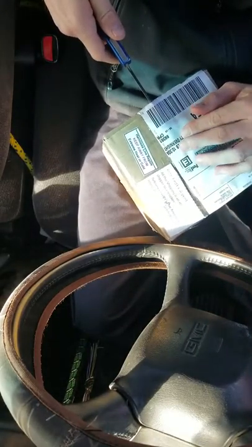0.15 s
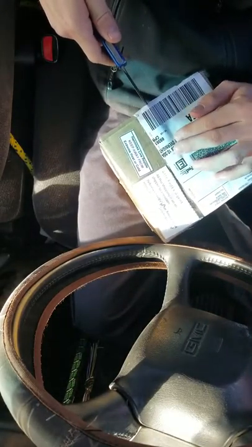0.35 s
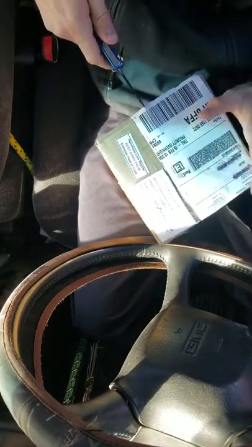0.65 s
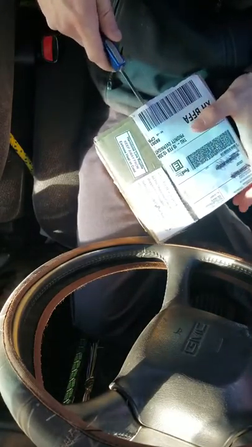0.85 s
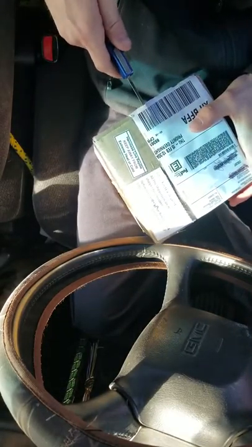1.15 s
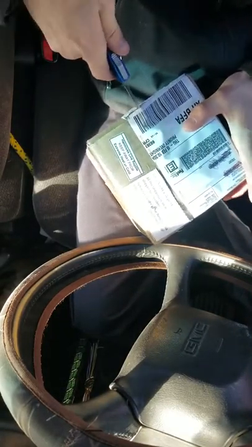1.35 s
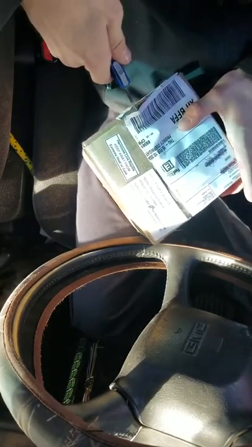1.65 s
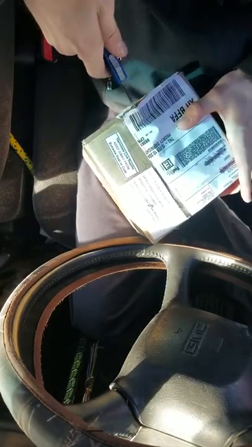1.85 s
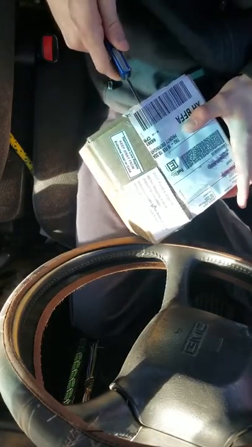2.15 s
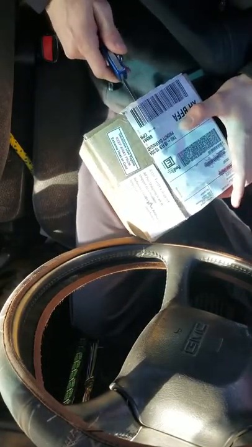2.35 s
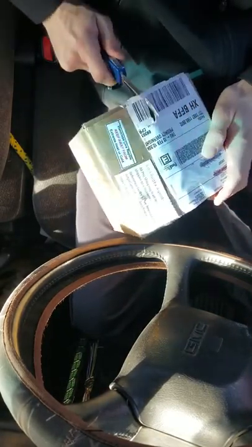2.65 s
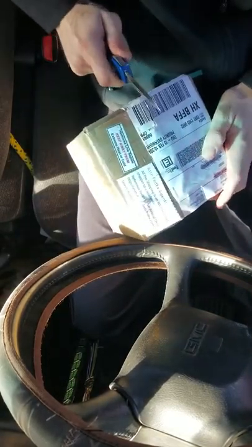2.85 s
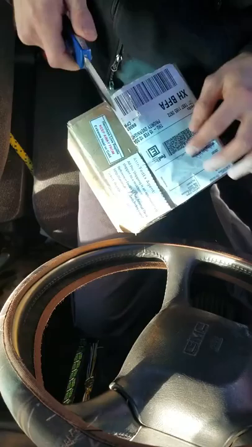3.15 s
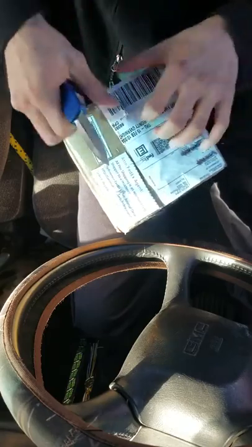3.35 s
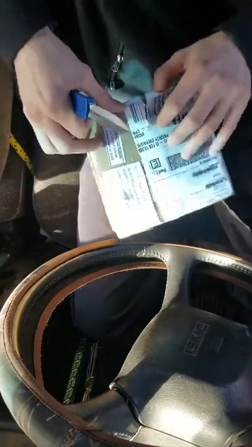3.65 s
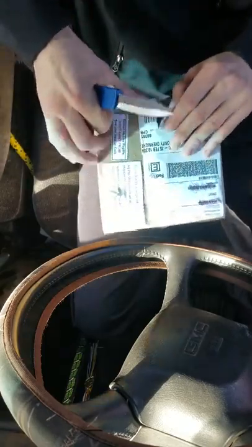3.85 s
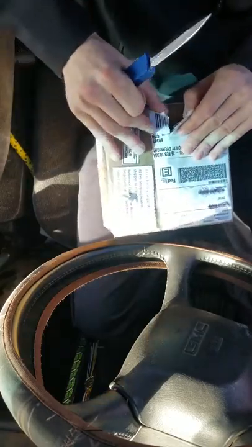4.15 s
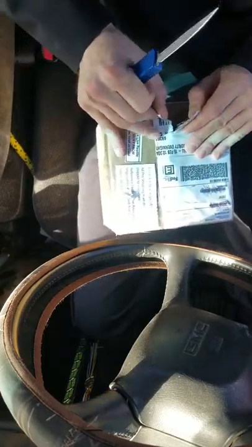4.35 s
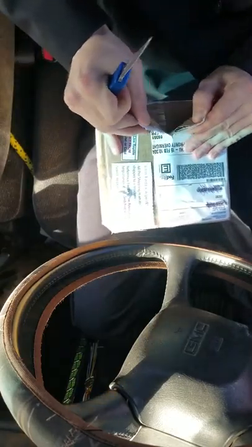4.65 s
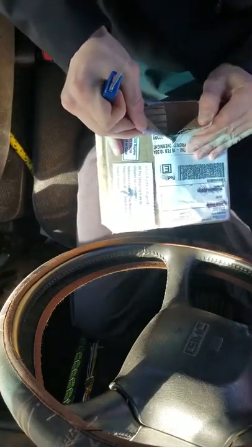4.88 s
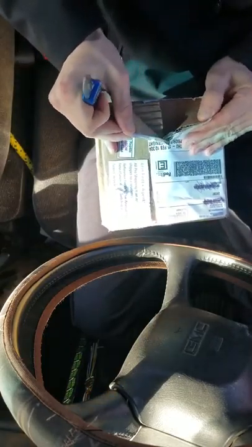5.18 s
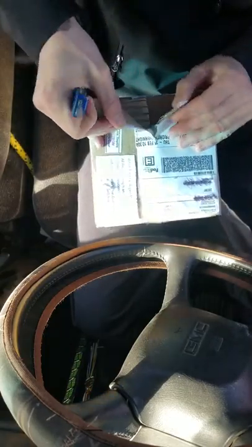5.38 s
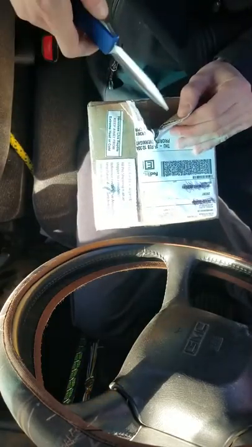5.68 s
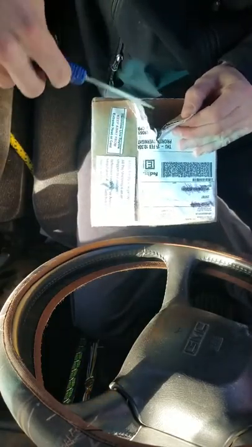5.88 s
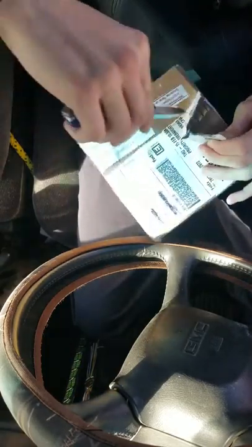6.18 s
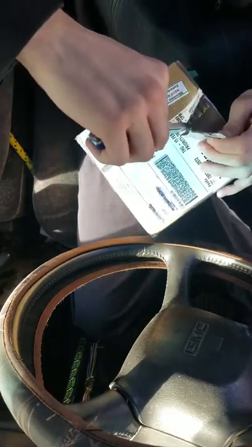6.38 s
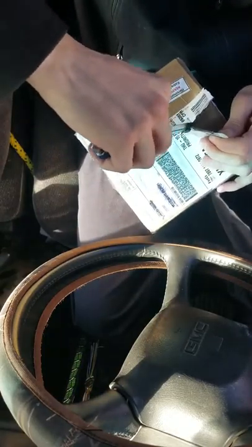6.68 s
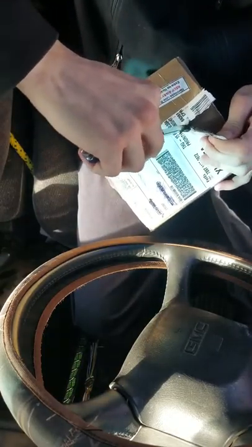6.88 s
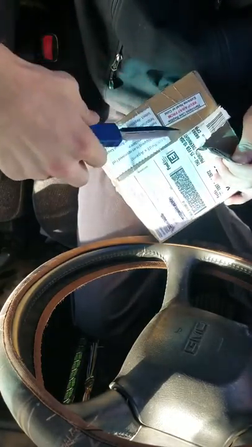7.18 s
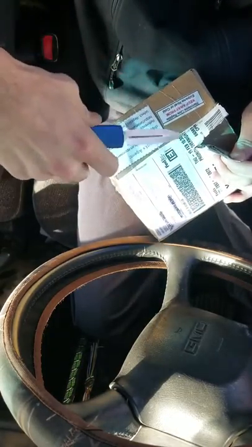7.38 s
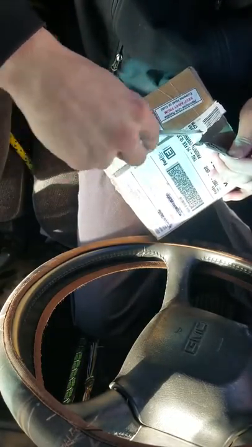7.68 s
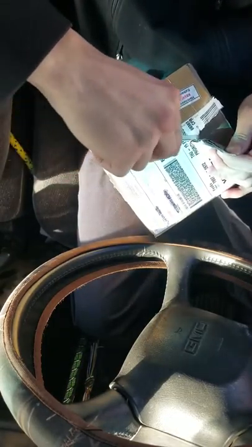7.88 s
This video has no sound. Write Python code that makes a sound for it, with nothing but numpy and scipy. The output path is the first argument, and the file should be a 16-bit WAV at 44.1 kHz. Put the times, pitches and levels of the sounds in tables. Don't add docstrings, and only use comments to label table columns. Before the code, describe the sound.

Close, dry stereo phone pickup inside a parked vehicle, with soft traffic rumble and faint hiss. A knife works through tape and cardboard in quick ticks and scrapes, with a loud hollow crack early and another soon after. After a lull, hands tear and peel tape in sharp crackles, then only soft rubbing, light knocks and a faint dull thud outside.

```python
import sys
import numpy as np
from scipy import signal
from scipy.fft import rfft, irfft, next_fast_len
from scipy.io import wavfile
from scipy.ndimage import uniform_filter1d

SR = 44100
rng = np.random.default_rng(int(sys.argv[2]) if len(sys.argv) > 2 else 0)


def decibels_to_gain(level_db):
    exponent = np.asarray(level_db, float) / 20
    return 10 ** exponent


def pcm_store(signal):
    levels = np.round(np.clip(np.atleast_2d(signal), -1, 1) * 32767)
    wavfile.write(sys.argv[1], SR, levels.astype(np.int16).T)


N = 353682


def on_log(table, hz):
    at, value = np.transpose(table)
    return np.interp(np.log(hz + 1), np.log(at + 1), value)


def unit(x):
    return x / np.sqrt(np.mean(x ** 2))


def walk(rate):
    k = int(SR / rate)
    held = np.repeat(rng.standard_normal(N // k + 1), k)
    return 1.3 * uniform_filter1d(uniform_filter1d(held, k), k)[:N]


def street(alike_hz=450., left_db=0.8, flicker_db=2.5):
    # hz, level_db (per Hz)
    street_colour = [(25, -5), (45, 0.5), (62, -6.5), (125, -2.5), (170, -10), (300, -20), (500, -25),
                     (800, -21.5), (1150, -29), (1900, -36), (2800, -39), (3400, -51.5), (8000, -47),
                     (15500, -48)]
    # hz, width_hz, boost_db
    cab_air = [(45, 30, 3), (87.5, 6.5, 11), (776, 150, 0.5), (2600, 500, 1.5)]
    # time_s, level_db
    surge = [
        (0.0, -64),
        (0.85, -59),
        (3.28, -69),
        (4.87, -62.5),
        (5.689, -64.5),
        (7.0, -63),
        (7.25, -58),
        (7.6, -62),
        (8.02, -57.5),
    ]
    hz = np.arange(N // 2 + 1) * SR / N
    mid, side = rfft(rng.standard_normal((2, N))) * decibels_to_gain(on_log(street_colour, hz))
    for air_hz, width_hz, db in cab_air:
        boost = 1 + (decibels_to_gain(db) - 1) / (1 + (2 * (hz - air_hz) / width_hz) ** 2)
        mid, side = mid * boost, side * boost
    alike = .97 / (1 + (hz / alike_hz) ** 2)
    mid, side = mid * np.sqrt(1 + alike), side * np.sqrt(1 - alike)
    spectrum = np.array([mid + side, mid - side])
    spectrum *= decibels_to_gain(-51) / np.std(irfft(mid, N))
    s, db = np.transpose(surge)
    swell_db = np.interp(np.arange(N) / SR, s, db - np.interp(7.4, s, db))
    swell = decibels_to_gain(swell_db + flicker_db * walk(7.2))
    low = 1 / (1 + (hz / 150) ** 4)
    rumble = irfft(spectrum * low, N) * swell
    steady = irfft(spectrum * (1 - low), N)
    return (rumble + steady) * decibels_to_gain(np.array([[left_db], [-left_db]]))


def resonate(x, part):
    box_parts = {"hollow": (95, 420, -1), "panel": (400, 1250, 1), "flap": (1250, 3200, -1),
                 "box": (400, 2800, 1), "paper": (3200, 8000, -1), "film": (9600, 16500, 1)}
    low_hz, high_hz, polarity = box_parts[part]
    band = signal.butter(2, (low_hz, high_hz), "band", fs=SR, output="sos")
    return polarity * signal.sosfilt(band, x)


def ring(hz, t60, t):
    return np.sin(2 * np.pi * hz * t) * np.exp(-np.log(1000) * t / t60)


def tear(draw, tear_s, main):
    t = np.arange(draw.shape[1]) / SR / tear_s
    rate = np.sqrt(t) * np.exp(-t) * np.where(t < 1, .3, 1)
    spray = draw[3] * (draw[4] > 1.4) * rate
    spray[int(tear_s * SR)] = main
    return spray


def cab(x, noise, shared_hz=1430.0, gap_s=0.00091, wet_db=0, early_s=0.0035, late_db=-10):
    t60_s, cab_db = 0.062, -2.5
    t = np.arange(noise.shape[1]) / SR
    late = decibels_to_gain(late_db) * np.exp(-np.log(1000) * t / t60_s)
    echo = noise * (np.exp(-t / early_s) + late) * (t > gap_s)
    bass = signal.sosfilt(signal.butter(2, shared_hz, fs=SR, output="sos"), echo)
    echo = echo[:2] - bass[:2] + bass[2]
    echo *= decibels_to_gain(cab_db + wet_db) / np.sqrt(np.sum(echo ** 2, axis=1, keepdims=True))
    echo[:, 0] = 1
    return signal.fftconvolve(x[None], echo)


def add(out, s, burst, part, db):
    arrival_s = 0.00017
    i = int((s + arrival_s) * SR)
    burst = resonate(burst, part)[:, :N - i]
    energy = np.sum(burst ** 2, axis=1, keepdims=True)
    out[:, i:i + burst.shape[1]] += burst * decibels_to_gain(db) / np.sqrt(energy * 100 / SR)


def ticks(tear_s=.0013, click=3.63, film_db=-2.26, early_s=0.0039, detune=.035, paper_db=0.24):
    # hz, level_db, t60_s
    paper_modes = [(3330, 7, 0.0016), (4300, -2.5, 0.0011), (5520, -4.5, 0.0021), (7650, -6.5, 0.0023)]
    film_modes = [(8600, -17.5, 0.0015), (11000, -10, .002), (12500, 0, 0.003), (14400, -1, 0.002),
                  (15900, -1, .002)]
    # start_s, paper_db, film_db (over paper)
    blade_ticks = [(.2198, -67, 2), (.3152, -61, -7), (.5251, -46.5, -20), (.7416, -54.5, -0.5),
                   (.8284, -49, -21), (.944, -48, -9), (.9827, -47, -5.5), (1.1462, -36.5, -17),
                   (1.192, -43, -6.5), (1.2525, -33, -7.5), (1.284, -53, -3), (1.342, -51.5, 0),
                   (1.3495, -41, -1.5), (1.3718, -54.5, 3), (1.3844, -48, 0.5), (1.4043, -58.5, -3),
                   (1.43, -26.5, -12), (1.5284, -54, -13), (1.5485, -48.5, -3.5), (1.5685, -47, -5),
                   (1.6125, -42, -9), (1.962, -52, -8), (1.996, -59, -3), (2.021, -59, -2),
                   (2.1222, -48.5, -15), (2.1648, -37.5, -10.5), (2.3173, -47, -15.5), (2.4, -50, -12.5)]
    peel_ticks = [(4.5314, -32, -1), (4.6352, -30, -1), (4.6711, -53, 12.5), (4.7777, -58, 9),
                  (4.806, -35.5, 0), (4.823, -45, 2), (4.883, -54.5, 19.5), (4.8933, -54.5, 18.5),
                  (4.9028, -55, 16), (4.913, -50, 20.5), (4.9258, -37, 3), (4.933, -38, 3), (4.95, -49, 6),
                  (4.969, -46.5, 4), (5.0, -55, 14.5), (5.058, -54, 0), (5.069, -49.5, 2),
                  (5.095, -72.5, 24), (5.132, -54, 9), (5.143, -49.5, 3), (5.2073, -60, 5),
                  (5.276, -58.5, 6), (5.287, -53, 3), (5.344, -56, 1.5), (5.39, -49.5, -10)]
    seam_ticks = [(2.528, -51, -6), (2.5582, -66, 10.5), (2.572, -58, -15), (2.5959, -38.5, 0),
                  (2.633, -24, -12.5), (2.6969, -35.5, -12), (3.046, -65, 1), (3.376, -60, -8),
                  (3.023, -56.5, -9), (3.758, -50.5, -13), (4.041, -56, -1), (4.0831, -49, -4),
                  (4.246, -53, 1.5), (4.3202, -67, 7), (4.402, -62.5, 6.5), (5.576, -58, -8),
                  (6.0015, -76, 7), (6.534, -61.5, 14.5), (6.729, -60, 11.5), (6.758, -61, -3),
                  (6.785, -64, 6), (6.82, -66, 3), (6.99, -70.5, 10), (7.9326, -72, 12)]
    small_ticks = [(.003, -63, -4), (0.14, -70, 2), (.158, -82, 4), (.183, -84, 2), (.6205, -78, -10),
                   (0.6703, -58, -5), (1.175, -57, -4), (1.227, -63, -4), (1.305, -59.5, -6),
                   (1.504, -61, 4), (1.664, -57.5, -8), (1.69, -59.5, -1.5), (1.8818, -58, -12),
                   (1.9407, -72, -8), (2.0444, -63, -9.5), (2.0901, -61, -10), (2.312, -57, -11),
                   (2.356, -71, 6), (2.43, -55.5, -15), (2.446, -59.5, -8), (2.47, -60.5, -2),
                   (2.514, -60.5, -10), (3.4376, -60.5, -8), (3.504, -65.5, 2), (3.5434, -76, -8),
                   (3.6641, -62, -13), (3.704, -56, -3.5), (3.87, -66, -12), (3.966, -66, 0),
                   (4.034, -66, 3), (4.112, -69, 4), (4.332, -71, 5.5), (4.354, -73, -10.5),
                   (4.4643, -63, -3.5), (4.4884, -66.5, 6.5), (4.944, -44, 3.5), (5.111, -62.5, 3),
                   (5.124, -59.5, 8), (5.2449, -71, 7), (5.293, -51.5, 3), (5.3268, -65, -4),
                   (5.3672, -62, 0), (6.035, -74, 8), (6.083, -69, 7), (6.403, -58, -21),
                   (6.633, -75, 12.5), (6.642, -72.5, 13), (6.691, -64, 2), (6.709, -68, 4),
                   (6.769, -69, 9), (6.826, -78, 5), (6.877, -78, 14),
                   (.841, -58, -14), (1.3, -57, -8), (2.6284, -31, -10), (4.652, -49, 0), (4.978, -56, 10),
                  (4.994, -60, 10), (5.036, -62, 8), (5.2651, -61, 4), (5.8502, -74, -3), (5.988, -74, 10),
                  (7.1, -62, -9), (6.416, -63, -15), (5.6, -70, -4), (6.590, -74, 0), (6.637, -72, 12),
                  (6.8245, -61, 3)]
    out, t = np.zeros((2, N)), np.arange(4000) / SR
    rows = blade_ticks + peel_ticks + seam_ticks + small_ticks
    chance = rng.standard_normal((len(rows), 5, len(t)))
    for (s, paper, film), draw in zip(rows, chance):
        glue = tear(draw, tear_s, main=2.1)
        heard = cab(glue, draw[:3], gap_s=0.00052, wet_db=2.7, early_s=early_s, late_db=-9)
        for part, modes, db in (("film", film_modes, paper + film + film_db),
                                ("paper", paper_modes, paper + paper_db)):
            body = sum(decibels_to_gain(gain_db) * ring(hz * (1 + detune * k), t60, t[:600])
                       for (hz, gain_db, t60), k in zip(modes, draw[4, ::-1]))
            body[0] = click
            add(out, s, signal.fftconvolve(heard, body[None]), part, db)
    return out


def pressure():
    # hardest_s, rise_s, fall_s, level_db, film_db (over box)
    blade_strokes = [(.54, 0.063, 0.097, -56.5, -19), (.76, 0.29, 0.45, -57, -12),
                     (.99, 0.045, 0.79, -54, -16), (1.28, 0.11, 0.47, -55, -4.5),
                     (1.399, 0.13, 0.18, -49, -10), (1.64, 0.33, 0.18, -58.5, -4.5),
                     (1.909, 0.14, 0.12, -51.5, -11), (2.15, 0.063, 0.084, -49.5, -17),
                     (2.42, 0.12, 0.26, -57, -16), (2.6, 0.15, 0.041, -58, -8),
                     (2.643, 0.0084, 0.033, -27, -20.5), (2.7, 0.07, 0.021, -45, -4.5),
                     (2.779, 0.11, 0.033, -52.5, -20.5)]
    hand_strokes = [(.005, .05, 0.041, -64, -6), (0.159, 0.065, 0.2, -71, -8),
                    (5.9, 0.046, 0.19, -58, -4.5), (6.9, 0.015, 0.093, -75, 11),
                    (3.12, 0.098, 0.16, -58, -7), (3.31, 0.15, 0.093, -55.5, -12),
                    (3.73, 0.16, 0.067, -50.5, -7), (3.88, 0.076, 0.089, -56.5, -10.5),
                    (4.1, 0.19, 0.5, -65, -12.5), (4.47, 1, 0.97, -62.5, -12),
                    (4.651, 0.046, 0.046, -44.5, -6.5), (4.82, 0.13, 0.079, -54.5, -6),
                    (4.931, 0.032, 0.066, -42, -4), (5.02, 0.19, 0.093, -59, 3),
                    (5.159, 0.19, 0.087, -53, -4), (5.28, 0.039, 0.056, -55, -9),
                    (5.411, 0.07, 0.061, -50.5, -18), (5.65, 0.3, 0.13, -59, -17.5),
                    (6., 0.088, 0.14, -55, -8.5), (6.172, 0.091, 0.06, -52.5, -11),
                    (6.43, 0.24, 0.23, -56.5, -14.5), (6.661, 0.051, 1, -57, -14),
                    (6.96, 0.082, 0.043, -55.5, -17), (7.92, .06, 0.06, -57.5, -6),
                    (4.89, .006, .04, -57, 10), (5.05, .04, .025, -62, -1), (6.33, 0.092, 0.093, -63, -6)]
    # from_s, to_s (a row whose to_s comes before its from_s hushes nothing)
    lifts = [
        (.33, 0.47),
        (1.73, 1.914),
        (2.82, 2.5),
        (5.71, 5.58),
        (7.05, 8.5),
    ]
    rest_db = {"hollow": -68, "box": -72.5, "paper": -93.5, "film": -91.5}
    drop_db = 12
    paper_share = 0.57
    hollow_db, hollow_slope, hollow_top_db = -26.5, -1.2, -1.5
    lift_db, lift_s = -12.5, 0.077
    t, power = np.arange(0, N, 64) / SR, 0
    for s, rise, fall, db, film in blade_strokes + hand_strokes:
        away = np.where(t < s, (s - t) / max(rise, .002), (t - s) / max(fall, .002))
        hollow = min(hollow_db + hollow_slope * film, hollow_top_db)
        tilt = np.array([hollow, 0, paper_share * film, film])
        power = power + decibels_to_gain(db - drop_db * away + tilt[:, None]) ** 2
    off = sum(np.clip(np.minimum(t - a, b - t) / lift_s + .5, 0, 1) for a, b in lifts)
    power = power * decibels_to_gain(lift_db * off) ** 2
    now = np.arange(N) / SR
    return {part: np.interp(now, t, np.sqrt(row + decibels_to_gain(db) ** 2))
            for (part, db), row in zip(rest_db.items(), power)}


def rubbing(grain_db=2.0, per_s=900., flicker_db=1.0, hiss=0.45, alike_hz=981.0, rub_db=0.5,
            patchy_db=1.26, slip_t60=0.0086):
    # hz, level_db (per Hz)
    rub_colour = [(130, -11), (430, -2), (650, -4.5), (800, -2.5), (1100, -4.5), (1450, -3), (1900, -6),
                  (2250, -5.5), (3500, -14), (4500, -16), (7000, -23), (9000, -19.5), (12300, -23.5),
                  (15500, -18.5)]
    slip_size = decibels_to_gain(grain_db * np.minimum(rng.exponential(size=N), 3.5))
    slips = (rng.random(N) < per_s / SR) * slip_size
    t = np.arange(1500) / SR
    slip_echo = np.exp(-2 * np.log(1000) * t / slip_t60)
    grain = signal.fftconvolve(unit(slips) ** 2, slip_echo)[:N]
    drive = rng.standard_normal((2, N)) * np.sqrt(hiss + grain / np.mean(grain))
    hz = np.arange(N // 2 + 1) * SR / N
    alike = .95 / (1 + (hz / alike_hz) ** 2)
    mid, side = rfft(drive) * decibels_to_gain(on_log(rub_colour, hz)) * np.sqrt([1 + alike, 1 - alike])
    drive = irfft(np.array([mid + side, mid - side]), N)
    out, grip = 0, flicker_db * walk(30)
    for part, gain in pressure().items():
        voice = unit(resonate(resonate(drive, part), part))
        out = out + voice * gain * decibels_to_gain(grip + patchy_db * walk(45) + rub_db)
    return out


def squeaks(fade=0.46):
    # start_s, length_s, pitch_hz, level_db
    squeak_rows = [(1.146, 0.0033, 4800, -43.5), (2.312, 0.0089, 5000, -52), (2.506, 0.0085, 4800, -59),
                   (2.525, 0.0073, 5040, -50), (2.573, 0.003, 5100, -45), (2.596, 0.003, 5100, -34),
                   (0.219, 0.0047, 5040, -62), (0.308, 0.005, 5040, -66), (4.635, 0.003, 4330, -32),
                   (4.946, 0.0084, 4400, -48), (4.968, 0.022, 7000, -52), (5.01, 0.042, 14000, -51),
                   (5.033, 0.025, 1900, -53), (5.161, 0.016, 1730, -53), (5.417, 0.0067, 1900, -54),
                   (6.15, 0.046, 1760, -59), (6.49, 0.01, 4560, -70), (6.78, 0.015, 1770, -57),
                   (6.937, 0.03, 1740, -52), (4.246, 0.004, 5120, -49), (4.08, 0.0063, 4620, -53),
                   (0.21, 0.0052, 1470, -58)]
    sharpness_q = 15
    out, t = np.zeros((2, N)), np.arange(6000) / SR
    chance = rng.standard_normal((len(squeak_rows), len(t)))
    for (s, length, hz, db), draw in zip(squeak_rows, chance):
        shape = np.exp(-np.maximum(t - length, 0) / (fade * length + .001))
        tone = signal.lfilter(*signal.iirpeak(hz, sharpness_q, fs=SR), draw * shape)
        i = int(s * SR)
        out[:, i:i + len(t)] += tone * decibels_to_gain(db) / np.sqrt(np.mean(tone[:int(length * SR)] ** 2))
    return out


def snaps(tear_s=0.0012, panel_t60=0.008, flap_t60=0.0064, spread=0.17, panel_db=2.5, thump_db=2.0,
          flap_db=0.23, hollow_ring=0.78):
    # hz, level_db, t60_s
    hollow_modes = [(86, -12.5, 0.28), (126, -10, .1), (164, -1, 0.086), (269, 0.5, 0.062),
                    (338, -0.5, 0.091), (388.4, 4, .055)]
    # start_s, panel_db, thump_db (over panel), flap_db (over panel), flap_hz
    first_cut = [(.6691, -58, 1, 4, 1330), (0.8275, -51.5, -4, 4, 1250), (.841, -49, 0, -4, 1400),
                 (0.9429, -43, 1, -1, 1300), (0.9831, -50.5, -15, 4, 3440), (1.0248, -54.5, 0.5, 2.5, 1520),
                 (1.067, -51.5, -10, -8, 1400), (1.0783, -51.5, -16, -1, 1200),
                 (1.146, -40.5, -15, 4.5, 950), (1.185, -53, -5, 3, 1710), (1.3035, -38, -4, 0.5, 1990),
                 (1.413, -39, -26, -9.5, 1470), (1.503, -43, -30, -9, 1505),
                 (1.5273, -43.5, -23, -15, 1812), (1.5533, -53.5, -9, 6.5, 3170),
                 (1.5682, -54.5, -4, 9.5, 1900), (1.6103, -41.5, -6.5, 0, 1930)]
    second_cut = [(1.8439, -44.5, -5.5, -7, 1530), (1.96, -41, -1, -7, 1530), (2.164, -46, -24, 11.5, 1310),
                  (2.4028, -35, -28, 2, 1490), (2.431, -53.5, 1, 10, 1300), (2.444, -50, -13, -11.5, 1090),
                  (2.462, -47, -11.5, -11, 1560), (2.5258, -50, -12.5, 2.5, 1900),
                  (2.596, -45.5, -16.5, 5, 1450), (2.6282, -35.5, -8.5, 3, 1800),
                  (2.632, -18, -1, -1.5, 1625), (2.658, -40.5, 10, -11, 1610),
                  (2.47, -48, -7.5, -6.5, 1600), (2.512, -54.5, -8.5, 1.5, 1600)]
    tearing = [(3.7173, -55, -19, -13, 1600), (4.199, -54.5, -9, 8.5, 1390), (4.532, -25, -3.5, 1, 1710),
               (4.625, -49, -1, 2, 1310), (4.632, -36, -9, -5, 1280), (4.6345, -22, -9.5, -7, 1700),
               (4.651, -43, 0, 2, 1700), (4.8022, -47.5, -7, 9, 1920), (4.9245, -33.5, -13.5, 3.5, 1880),
               (4.934, -43.5, -13, 7, 1780), (4.9484, -62.5, -16, 25.5, 1600), (5.39, -44, 11, -5, 1600)]
    lid_knocks = [(1.193, -55, -6, 14, 2300), (1.213, -47, -7, -14, 1630), (2.118, -41, -2, -3.5, 1380),
                  (2.698, -30, -8, -2, 1520), (3.375, -72, -13, 20, 1960), (3.424, -57.5, 3, -4, 2640),
                  (3.985, -60, -10, -15, 1500), (4.029, -58, -12, -14, 1500), (4.045, -53, -12, -0.5, 1600),
                  (4.061, -56, -10, -22, 1500), (4.072, -60, -14, -15, 1500), (4.082, -59.5, -15, 8, 1460),
                  (6.4194, -59.5, -4, 9.5, 1620), (6.577, -53, -8, -12, 1770), (6.612, -53, -11, -18, 1310),
                  (6.639, -50.5, -29, -28, 1150), (6.6661, -43.5, -26, -17, 1580),
                  (6.726, -47.5, -25, 1, 1420), (6.947, -49, -10, -13, 1753), (7.719, -58, 16.5, 1, 1553)]
    taut_snaps = [
        (0.5241, -47, -4, 6.5, 1970),
        (0.7428, -55, 6.5, 3, 1250),
        (1.3485, -39.5, -16, 4.5, 1940),
        (1.3838, -45, -9.5, 4, 1960),
        (1.4288, -18, -1.5, 3, 1560),
        (3.5425, -54.5, -26, 3, 1250),
        (3.742, -50.5, -3.5, 2, 1070),
        (1.2516, -32, -15.5, 4.5, 1520),
        (5.999, -53.5, -14, 12, 1436),
    ]
    side_hz, lid_hz, taut_hz, grip_detune = 662.5, 425, 900, 0.03
    lid_ring = 1.9
    out, t = np.zeros((2, N)), np.arange(int(.15 * SR)) / SR
    near = 1 + spread * np.array([-1.5, -0.5, 2.3, 7.0])
    weight = decibels_to_gain(np.array([-3.5, 6.0, -4.5, -11.5])) * [-1, 1, -1, 1]
    facing = (-1) ** np.arange(len(hollow_modes))
    rows = [(*row, side_hz) for row in first_cut + second_cut + tearing]
    rows += [(*row, lid_hz) for row in lid_knocks]
    rows += [(*row, taut_hz) for row in taut_snaps]
    chance = rng.standard_normal((len(rows), 5, 4000))
    for (s, panel, thump, flap, flap_hz, panel_hz), draw in zip(rows, chance):
        ring_s = panel_t60 * (lid_ring if panel_hz == lid_hz else 1)
        panel_hz = panel_hz * (1 + grip_detune * draw[4, -1])
        fibres = tear(draw, tear_s, main=8.3)
        heard = cab(fibres, draw[:3], wet_db=-1.5)
        detune = 1 + .04 * draw[3, -len(hollow_modes):]
        hollow = sum(f * decibels_to_gain(db) * ring(hz * k, t60 * hollow_ring, t)
                     for (hz, db, t60), k, f in zip(hollow_modes, detune, facing))
        panel_body = weight @ ring(panel_hz * near[:, None], ring_s, t)
        flap_body = weight @ ring(flap_hz * near[:, None], flap_t60, t)
        add(out, s, signal.fftconvolve(heard, panel_body[None]), "panel", panel + panel_db)
        add(out, s, signal.fftconvolve(heard, flap_body[None]), "flap", panel + flap + flap_db)
        push = signal.fftconvolve(np.abs(fibres), hollow) * np.ones((2, 1))
        add(out, s, push, "hollow", panel + thump + thump_db)
    return out


def far_thud(side_db=-4, tilt_hz=2000):
    # start_s, loudest_s, fade_s, tail_s, level_db, tail_db
    thud = (7.722, 7.756, .014, .12, -50, -11)
    start, end, fade, tail, db, tail_db = thud
    low_hz, high_hz = 600, 3450
    t = np.arange(N) / SR
    rise = np.clip((t - start) / (end - start), 0, 1) ** .6
    after = np.maximum(t - end, 0)
    glass = signal.cheby2(4, 40, (low_hz / 3, high_hz * 1.3), "band", fs=SR, output="sos")
    mid, side = signal.sosfilt(glass, rng.standard_normal((2, N)))
    side = decibels_to_gain(side_db) * side
    scuff = signal.lfilter(*signal.butter(1, tilt_hz, fs=SR), np.array([mid + side, mid - side]))
    decay = np.exp(-after / fade) + decibels_to_gain(tail_db) * np.exp(-after / tail)
    return unit(scuff) * decibels_to_gain(db + .8 * walk(60)) * rise * decay


def ports(x):
    # hz, left_minus_right_db
    port_db = [(60, 3), (110, 4), (200, 0.5), (380, 4), (700, -9), (1290, -5.5), (2380, 8.5), (4400, -2),
               (8120, 12), (15000, 9.5)]
    # hz, lead_rad
    port_lead = [(600, 0), (1290, 4.3), (1980, 5), (2840, 8.8), (3880, 10.5), (16000, 46)]
    # hz, width_hz, level_db
    mic_cavity = [(283, 22, 3), (520, 58, -4.5), (590, 88, 2), (1250, 140, 0), (1852, 280, 3),
                  (2222, 330, -5.5), (3630, 410, -3), (4800, 970, 0.5), (7000, 550, 3), (9500, 1500, -1)]
    size = next_fast_len(N + 4096)
    hz = np.arange(size // 2 + 1) * SR / size
    half = decibels_to_gain(on_log(port_db, hz) / 2)
    at, lead = np.transpose(port_lead)
    lag = np.exp(-1j * np.interp(hz, at, lead))
    cavity_db = sum(db / (1 + (2 * (hz - peak_hz) / width) ** 2) for peak_hz, width, db in mic_cavity)
    ceps = irfft(np.log(decibels_to_gain(cavity_db)), size)
    i = np.arange(size)
    cavity = np.exp(rfft(ceps * (1 + np.sign(size / 2 - i) * (i > 0))))
    left = irfft(rfft(x[0], size) * cavity * half, size)
    right = irfft(rfft(x[1], size) * cavity * lag / half, size)
    return np.array([left, right])[:, :N]


def scene():
    box = snaps() + rubbing() + squeaks() + ticks()
    return ports(box) + street() + far_thud()


def band_limit(x):
    return signal.sosfilt(signal.butter(12, 17020, fs=SR, output="sos"), x)


def record(dry):
    rounded = np.tanh(dry)
    low_pass = signal.ellip(8, .2, 26, 15800, fs=SR, output="sos")
    cut = signal.sosfilt(low_pass, (dry + rounded) / 2)
    return band_limit(np.clip(cut, -.93, .93))


dry = scene()
out = record(dry)
pcm_store(out)
```